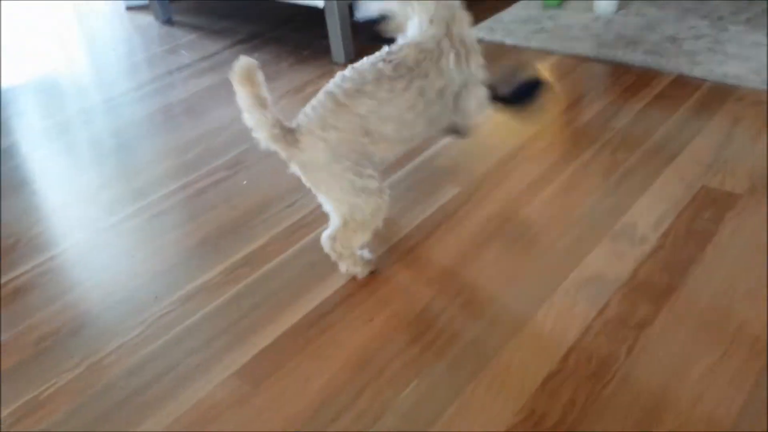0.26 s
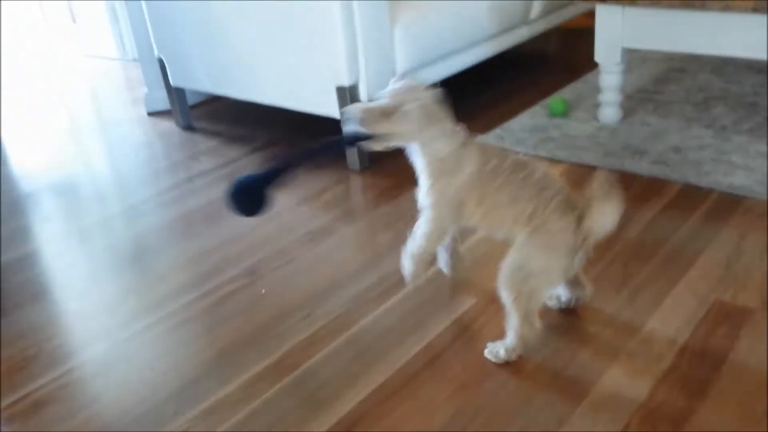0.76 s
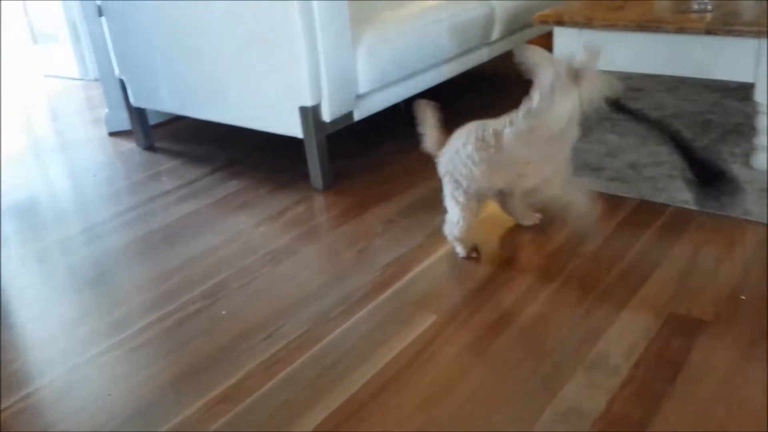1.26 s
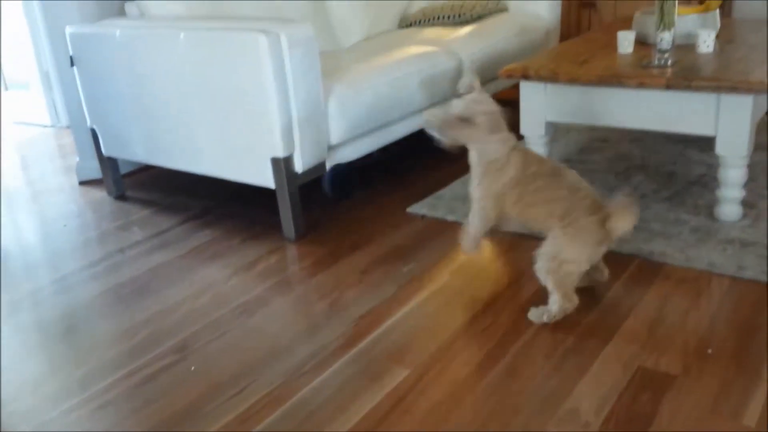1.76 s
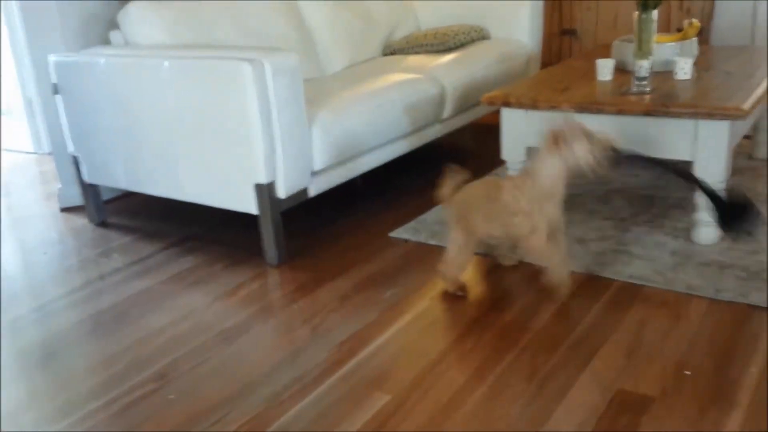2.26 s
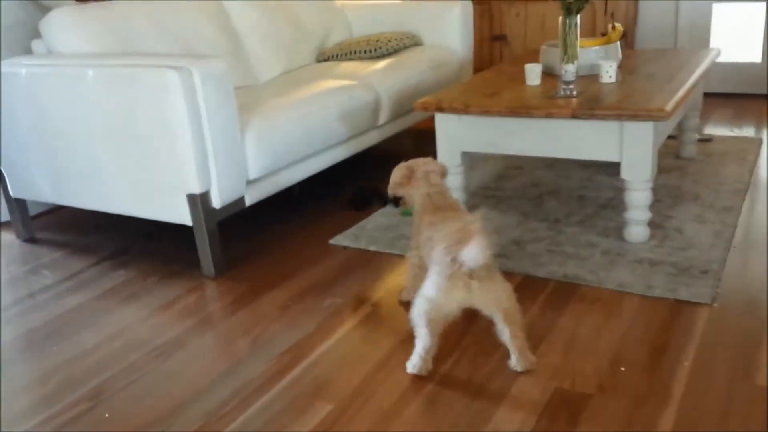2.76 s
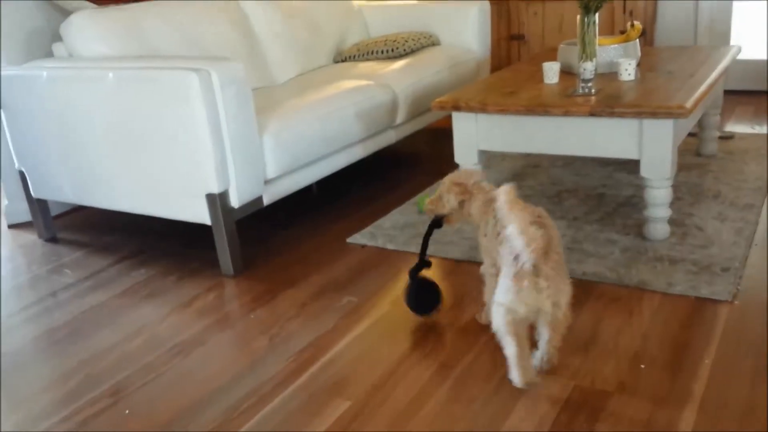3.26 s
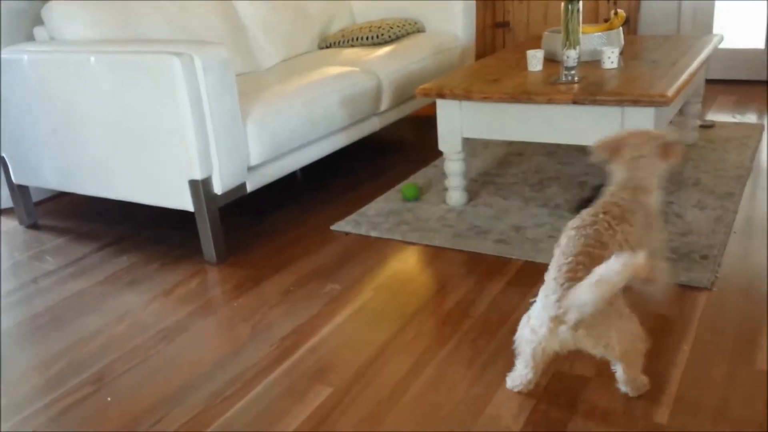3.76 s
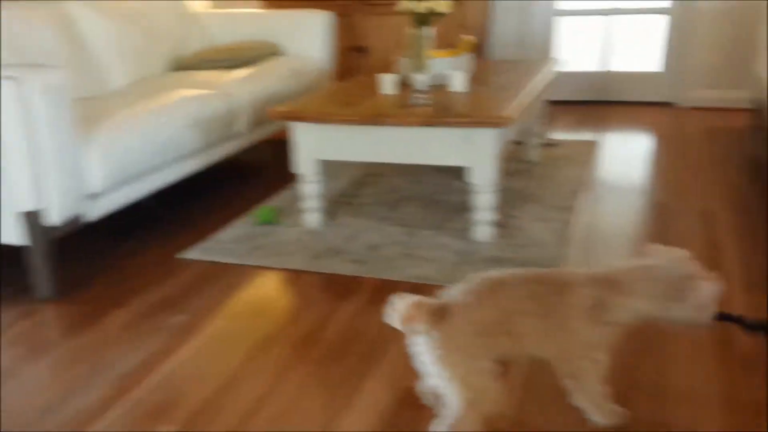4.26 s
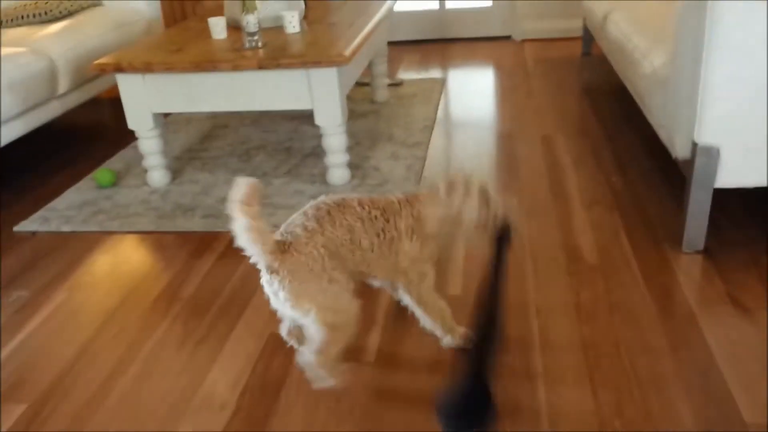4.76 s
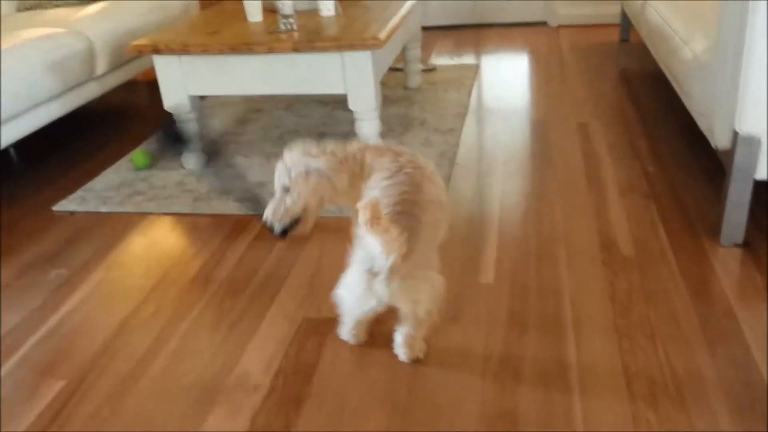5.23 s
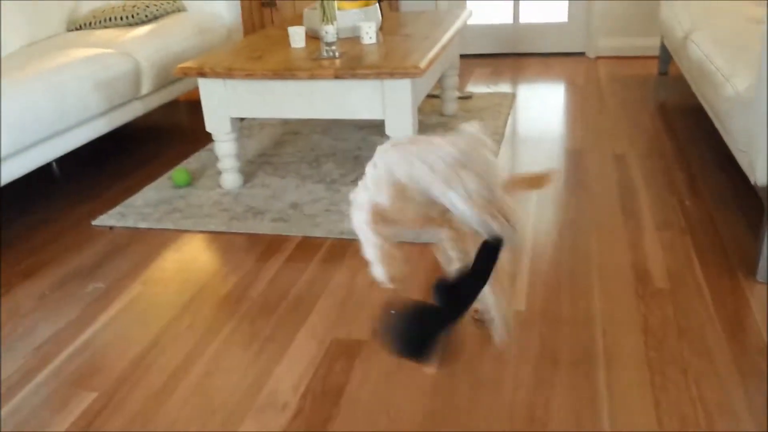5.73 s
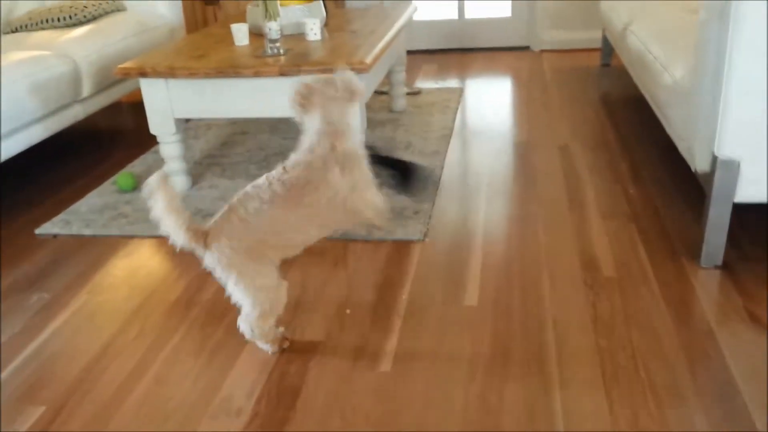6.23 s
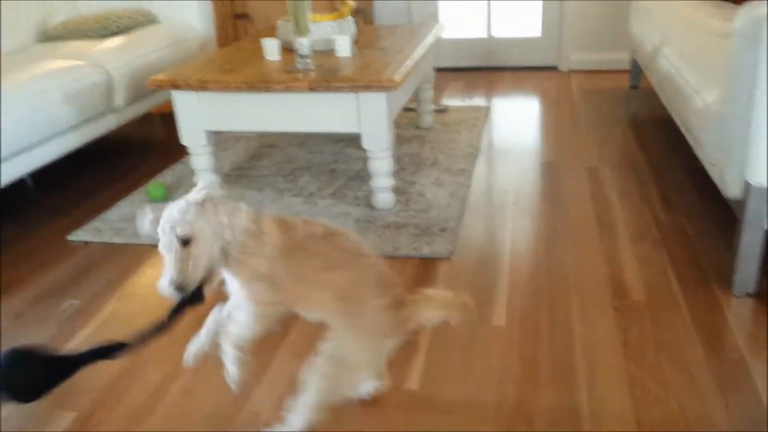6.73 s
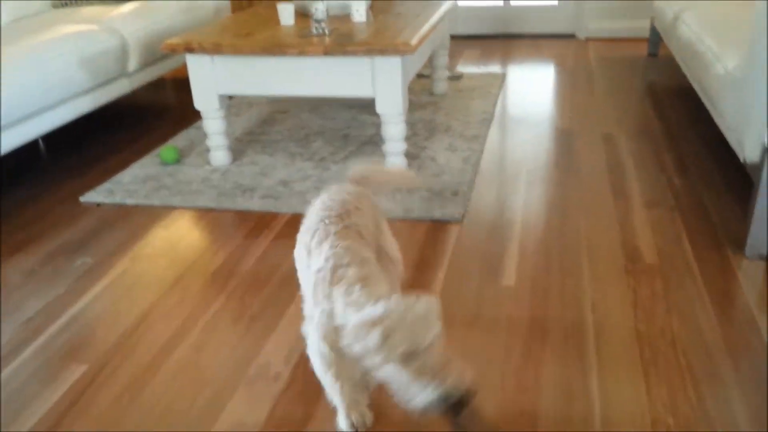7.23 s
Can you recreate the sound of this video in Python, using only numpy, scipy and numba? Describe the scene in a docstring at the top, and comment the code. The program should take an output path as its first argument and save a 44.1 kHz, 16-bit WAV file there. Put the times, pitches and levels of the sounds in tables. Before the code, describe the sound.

Short playful growls and snorts from a small dog indoors, mixed with sharp knocks, clicking claws and skids on floorboards.

```python
"""You hear a small dog growl and snort in play as it swings a ball on a strap around a living room.
Its vocal folds buzz through throat and mouth, and its breath hisses past the teeth and through the nose.
The ball knocks on the wooden floor, claws click and skid, paws thud, and a piece of metal clinks.
A finger muffles the left port (sound opening) of a hand-held microphone, then slides off with a few pops.
"""
import sys
import numpy as np
from scipy import signal
from scipy.fft import rfft, irfft
from scipy.io import wavfile
from scipy.ndimage import uniform_filter1d
from numba import njit

SR = 44100
rng = np.random.default_rng(int(sys.argv[2]) if len(sys.argv) > 2 else 0)


def output_pcm(signal):
    """Save a mono or channel-first signal as 16-bit PCM at the path in sys.argv[1].

    Samples are clipped to [-1, 1] before scaling.
    """
    pcm = np.clip(np.atleast_2d(signal).T, -1, 1) * 32767
    wavfile.write(sys.argv[1], SR, np.round(pcm).astype(np.int16))


N = 330617
TIME = np.arange(N) / SR

# Growls, each with one surge as the dog tugs. Each row: start, length and rise time in seconds;
# throat, mouth and hiss levels in dB; sag in dB per second; surge start in seconds; surge and extra
# mouth opening in dB; base pitch in Hz; roughness from 0 to 1; throat shift in octaves; hum offset in dB.
GROWLS = [(1.13, 0.36, 0.018, -23.5, -33.5, -43.5, 33, 1.24, 1, 4.5, 162.4, 0.21, 0.1, -7.5),
          (1.69, 0.3, 0.022, -27.5, -35, -49, 3, 1.925, 2.5, -5.5, 146.5, 0.25, -0.057, -8),
          (5.996, 0.4007, 0.0091, -20, -29.5, -41.5, 42, 6.28, 6, 1, 168.2, 0.18, 0.045, -13.5),
          (6.612, 0.33, 0.035, -25, -33.5, -47, 8, 6.738, 7.5, -2.5, 146.2, 0.35, 0.11, -10)]
# Snorts, with the mouth shut on the strap. Each row: start and length in seconds,
# throat and nose levels in dB, starting pitch of the whistle in Hz.
SNORTS = [(0.253, 0.021, -49.5, -55.5, 1640), (0.485, 0.089, -41.5, -51.5, 1684),
          (2.356, 0.22, -37, -46, 1658), (2.797, 0.075, -55.5, -51, 1763), (4.068, 0.051, -43, -47.5, 1660),
          (4.815, 0.075, -48, -49, 1663), (5.138, 0.042, -52.5, -59.5, 1720),
          (5.355, 0.087, -44, -51.5, 1600), (5.768, 0.059, -35, -46.5, 1697)]
# Where throat, mouth and nose ring. Each row: frequency in Hz, width in Hz, level in dB.
THROAT_RESONANCES = [(160.2, 93, -0.3), (237.5, 167, -2), (348, 169, -4.5)]
MOUTH_RESONANCES = [(686, 123, 3), (778, 163, 0), (956, 150, 3.5), (1226, 112, -6), (1541, 155, -3.5),
                    (2550, 410, -16), (3224, 210, -15.5)]
NOSE_RESONANCES = [(830, 450, 4.5), (1672, 307, 3.5), (2930, 3900, -8.5)]
# Ball and paws hitting the floor. Each row: start in seconds, level in dB, boom and slap offsets in dB.
KNOCKS = [(0.696, -32.5, 0.5, 21), (1.72, -18, -10.5, -2), (2.234, -21.5, -6, 4.5), (2.735, -35.5, 5.5, 12),
          (3.136, -25, -10, -4), (4.288, -34.5, -9.5, -2), (5.495, -26, -3, 14.5), (5.965, -27, -1.5, -6),
          (6.756, -8.5, -15, -16), (7.201, -14.5, -9, -4.5), (7.2085, -32, -13, -11)]
# Claws landing; a slow landing is a scuff. Each row: start in seconds, level in dB, landing in seconds.
CLAW_LANDINGS = [(0.544, -17.5, 0.014), (1.108, -10.5, 0.01), (1.608, -14.5, 0.019), (2.159, -13.5, 0.0036),
                 (2.658, -11.5, 0.0067), (2.82, -19, 0.0056), (3.175, -17, 0.008), (4.331, -21, 0.047),
                 (5.986, -6.5, 0.0072), (6.556, -9, 0.013), (7.0304, -18.5, 0.004), (7.332, -23.5, 0.0039)]
# Paws sliding. Each row: start and length in seconds, level in dB, fade in dB per second (minus grows).
SKIDS = [(0.0, 0.28, -50.5, 24), (1.92, 0.058, -36.5, 3), (2.391, 0.14, -41, 6), (3.6, 0.55, -60.5, -11),
         (4.285, 0.41, -51.5, 2.5), (7.233, 0.13, -44, 80)]
# Soft paw thuds and light blows on metal. Each row: start in seconds, level in dB.
PAW_THUDS = [(2.239, -18), (2.704, -13.5), (2.936, -26.5), (3.098, -25.5), (3.849, -29), (3.878, -29)]
CLINKS = [(3.398, -27.5), (3.861, -47), (4.232, -42)]
# The notes that floorboards and metal ring with. Each row: frequency in Hz, level in dB.
BOARD_NOTES = [(105, -9), (190, -6), (320, -4), (790, 3), (930, 0), (1180, -8), (1600, -8.5)]
METAL_NOTES = [(1665, -9), (2763, -5), (3362, -9.5), (4285, -10.5), (4945, -5), (6255, -6)]
# Tone of breath, the ball's cloth, claws, skids and the quiet room. Each row: frequency in Hz, gain in dB.
BREATH_TONE = [(1500, 1), (3000, -1), (5800, 1), (6900, 10.5), (9400, 6.5), (11500, -11), (15000, -111)]
CLOTH_TONE = [(150, -9.5), (950, 6.5), (1400, -3.5), (2200, -7.5), (8000, -20), (14000, -35)]
CLAW_TONE = [(4000, -15.5), (6300, -2), (10000, 2.5), (15000, -23.5)]
SKID_TONE = [(400, 19), (900, 15.5), (1750, 18), (2400, 12), (8800, 13.5), (15000, -16.5)]
ROOM_TONE = [(30, -11), (300, -2.5), (600, -8.5), (1700, -14.5), (3000, -19), (6500, -11.5), (15000, -25)]
# The left port with the finger on it and off it. Each row: frequency in Hz, gain in dB.
PORT_COVERED = [(100, 2.5), (1000, -7), (2800, -18), (7000, -25), (15000, -24)]
PORT_FREED = [(100, 3), (2800, -1), (7000, -13.5), (15000, -20.5)]
# The finger rubbing the port. Each row: time in seconds, level in dB, width in seconds.
FINGER_POPS = [(4.267, -23.5, 0.0004), (4.351, -22, 0.0003), (4.4219, -4, 0.00029), (4.4389, -5, 0.0018),
               (4.444, -4.5, 0.00018), (4.4633, 1.5, 0.000059), (4.4714, -2.5, 0.000049),
               (4.498, -6, 0.000044), (4.5118, -6.5, 0.00004), (6.146, -4.5, 0.000053)]
# Rumble of the hand holding the microphone. Each row: time in seconds, level in dB.
HAND_RUMBLE = [(0, -54), (4.4, -45.5), (5, -67), (6.5, -60)]
# The room's echo. Each row: frequency in Hz, seconds to fade by 60 dB, level in dB,
# likeness of left and right (1 is the same).
ROOM_ECHO = [(93, 0.73, 1, 0.91), (247, 0.53, -0.5, 1), (770, 0.62, 6.5, 0.67), (1700, 0.94, 10.5, 0),
             (10100, 0.68, 8, 0.81)]


def dog(throat_db=-1, nose_db=-4, snort_hiss_db=-2, gust_db=3, rasp=0.7, leak=0.11,
        bend_octaves=0.11, jaw_octaves=0.064):
    """One voice box drives chest, throat and mouth, which bend as the head shakes; breath adds hiss."""
    (throat_gain, mouth_gain, air_gain, hum_gain), pitch_hz, roughness, shift = growl_controls()
    shake = wander()
    bend = bend_octaves * shake
    pitch_hz = pitch_hz * 2 ** bend
    slaps, puffs = vocal_folds(pitch_hz, roughness)
    hum = cut(np.sin(2 * np.pi * np.cumsum(pitch_hz) / SR), 139, "high", order=6)
    buzz = slaps + rasp * puffs * noise()
    throat = resonate(buzz, THROAT_RESONANCES, shift + bend)
    throat = evened(cut(cut(throat, 430, "low", order=6), 132.7, "high", order=6))
    mouth = evened(resonate(buzz, MOUTH_RESONANCES, jaw_octaves * shake))
    nose = evened(resonate((puffs + 1) * noise(), NOSE_RESONANCES, jaw_octaves * shake / 2))
    hiss = evened(coloured((puffs + leak) * noise(), BREATH_TONE))
    hiss *= from_db(gust_db * wander())  # air gusts past the teeth
    voice = from_db(throat_db) * throat_gain * throat + mouth_gain * mouth + hum_gain * hum
    breath = air_gain * (hiss + from_db(nose_db) * nose)
    return voice + breath + snorts(throat, nose + from_db(snort_hiss_db) * hiss)


def growl_controls(release_s=0.051, surge_rise_s=0.036, octaves_per_db=0.205):
    """Effort sags through each growl and surges once; loudness and pitch follow it."""
    gains = np.zeros((4, N))
    # Between growls the voice is set for snorts: the throat rings lower with the mouth shut.
    pitch_hz, roughness, shift_octaves = np.full(N, 133.5), np.full(N, 0.3), np.full(N, -0.18)
    for (start, length_s, rise_s, throat_db, mouth_db, hiss_db, sag,
         surge_start, surge_db, opening_db, base_hz, rough, octaves, hum_db) in GROWLS:
        span = (TIME >= start) & (TIME < start + length_s + 2 * release_s)
        t = TIME[span] - start
        tug = np.maximum(TIME[span] - surge_start, 0) / surge_rise_s
        surge = (tug * np.exp(1 - tug)) ** 2
        effort_db = surge_db * surge - sag * t
        levels_db = [throat_db + effort_db,
                     mouth_db + 0.95 * effort_db + opening_db * surge,
                     hiss_db + 0.86 * effort_db,
                     throat_db + hum_db + effort_db]
        gains[:, span] = held(t, length_s, rise_s, release_s) * from_db(levels_db)
        pitch_hz[span] = base_hz * 2 ** (octaves_per_db * effort_db)
        roughness[span], shift_octaves[span] = rough, octaves
    return gains, pitch_hz, roughness, shift_octaves


def vocal_folds(pitch_hz, roughness, jitter=0.35, shimmer_db=9, flutter_hz=30, flutter_db=8, puff_s=0.0022):
    """The folds slap shut unevenly, throbbing with the loose throat; a puff of air follows each slap."""
    slaps, now, flutter = np.zeros(N), 0, 0
    for late, strong, slip in rng.standard_normal((1600, 3)).clip(-2, 2):
        i = min(int(now * SR), N - 1)
        slap_db = roughness[i] * (shimmer_db * strong + flutter_db * np.sin(flutter))
        add(slaps, now, from_db([slap_db]))
        period = np.exp(jitter * roughness[i] * late) / pitch_hz[i]
        now += period
        flutter += 2 * np.pi * flutter_hz * period + slip / 2
    puffs = signal.lfilter([1], [1, -np.exp(-1 / (puff_s * SR))], slaps)
    return rms_one(slaps), rms_one(puffs)


def snorts(throat, breath, rise_s=0.0048, whistle_db=2, whistle_width_hz=62, sink_octaves_per_s=1):
    """Each snort is a short grunt and a blast of breath, with a sinking whistle from the nostrils."""
    grunt_gain, breath_gain, whistles = np.zeros((3, N))
    t = TIME[:SR // 2]
    for start, length_s, throat_db, nose_db, hz in SNORTS:
        swell = (1 - np.exp(-(t / rise_s) ** 2)) * np.exp(-(t / length_s) ** 4)
        whistle = evened(resonate(noise()[:len(t)], [(hz, whistle_width_hz, 0)], -sink_octaves_per_s * t))
        add(grunt_gain, start, from_db(throat_db) * swell)
        add(breath_gain, start, from_db(nose_db) * swell)
        add(whistles, start, from_db(nose_db + whistle_db) * swell * np.exp(-t / length_s) * whistle)
    return grunt_gain * throat + breath_gain * breath + whistles


def knocks(level_db=-2, boom_db=8, slap_db=14, slap_fade_s=0.04, ring_cycles=13, folds_per_s=800):
    """A blow makes the boards ring, low notes longest; the ball's cloth slaps down, fold after fold."""
    out, t = np.zeros(N), TIME[:SR // 3]
    for start, knock_db, boom, slap in KNOCKS:
        notes = [(hz, db + (boom + boom_db) * (hz < 400), ring_cycles / hz) for hz, db in BOARD_NOTES]
        wood = struck(notes, t)
        folds = (rng.random(len(t)) < folds_per_s / SR) * rng.uniform(-1.94, 1, len(t))
        folds[0] = 1
        cloth = coloured(folds * from_db(slap + slap_db - 60 * t / slap_fade_s), CLOTH_TONE)
        add(out, start, from_db(knock_db + level_db) * (wood + cloth))
    return out


def smacks(level_db=1, hz=880, rise_s=0.0006, slap_share=0.25):
    """The instant of contact with the boards: one or two hard cycles, stronger with the slap."""
    out, t = np.zeros(N), TIME[:SR // 2]
    smack = np.cos(2 * np.pi * hz * t) * t / rise_s * np.exp(1 - t / rise_s)
    for start, knock_db, _, slap in KNOCKS:
        add(out, start, from_db(knock_db + level_db + slap_share * slap) * smack)
    return out


def claws(level_db=4, ticks_per_s=300, scatter_db=-18, spread_db=7, sharp_s=0.0039):
    """Ticks swell and die away as a paw lands; the quicker the landing, the stronger the first tick."""
    out, t = np.zeros(N), TIME[:SR // 5]
    for start, db, landing_s in CLAW_LANDINGS:
        swell = t / landing_s * np.exp(1 - t / landing_s)
        sizes = from_db(scatter_db + spread_db * rng.standard_normal(len(t)).clip(-2, 2))
        ticks = swell * sizes * (rng.random(len(t)) < ticks_per_s / SR) * rng.choice([-1, 1], len(t))
        ticks[0] = sharp_s / landing_s
        add(out, start, from_db(db + level_db) * ticks)
    return 2 * coloured(out, CLAW_TONE)


def skids(grain_db=7, grain_samples=40):
    """Pads and claws scrape over the boards in fine grains."""
    gain, t = np.zeros(N), TIME[:SR]
    for start, length_s, db, fade in SKIDS:
        add(gain, start, held(t, length_s, rise_s=0.0012, release_s=0.082) * from_db(db - fade * t))
    scrape = noise()
    grain_sizes = from_db(grain_db * rng.standard_normal(N // grain_samples + 1).clip(-2, 2))
    scrape *= np.repeat(grain_sizes, grain_samples)[:N]
    return gain * rms_one(coloured(scrape, SKID_TONE))


def paw_thuds(level_db=-1, soft_hz=75, hard_hz=130, ring_cycles=5):
    """A paw pushes the floor briefly; a harder landing is shorter and higher."""
    out, t = np.zeros(N), TIME[:SR // 5]
    for start, db in PAW_THUDS:
        hz = np.interp(db, [-35, -20], [soft_hz, hard_hz])
        swell = (1 - np.exp(-2 * hz * t)) * from_db(-60 * t * hz / ring_cycles)
        add(out, start, 2 * from_db(db + level_db) * swell * np.sin(2 * np.pi * hz * t))
    return out


def metal_clinks(rattle_db=-8, rattle_fade_s=0.04, strike_db=9, strike_fade_s=0.025, ring_fade_s=0.055):
    """Light blows on metal: a brief rattle, a bright strike and a short ring."""
    out, t = np.zeros(N), TIME[:SR // 2]
    for start, clink_db in CLINKS:
        rattle = cut(rng.standard_normal(len(t)), [600, 7000], "band")
        rattle *= from_db(rattle_db - 60 * t / rattle_fade_s)
        strike = cut(noise()[:len(t)], [4200, 4900], "band") * from_db(strike_db - 60 * t / strike_fade_s)
        ring = struck([(hz, db, ring_fade_s) for hz, db in METAL_NOTES], t)
        add(out, start, from_db(clink_db) * (rattle + strike + ring))
    return out


def finger_muffle(x, off_at_s=4.463, slide_s=0.034):
    """The finger muffles the left port; more treble gets in once it slides off."""
    freed = np.clip((TIME - off_at_s) / slide_s + 0.5, 0, 1)
    return (1 - freed) * coloured(x, PORT_COVERED) + freed * coloured(x, PORT_FREED)


def handling_noise(rumble_band_hz=(24, 110), hiss_db=-65):
    """The finger makes sharp pressure dips that rebound slowly; the hand rumbles over a faint hiss."""
    pops, t = np.zeros(N), TIME[:SR // 100] - 0.005
    for centre_s, db, width_s in FINGER_POPS:
        add(pops, centre_s + t[0], -from_db(db) * np.exp(-np.abs(t) / width_s))
    rumble_gain = from_db(np.interp(TIME, *np.transpose(HAND_RUMBLE)))
    rumble = rumble_gain * rms_one(cut(noise(), rumble_band_hz, "band"))
    return cut(pops, 110, "high") + rumble + from_db(hiss_db) * noise()


def living_room(x, spots=4, spots_per_s=3):
    """As the dog darts about, its sound passes from one pattern of echoes to another."""
    out = 0
    for spot in range(spots):
        away = np.abs((spots_per_s * TIME - spot + spots / 2) % spots - spots / 2)
        share = np.cos(np.pi / 2 * np.minimum(away, 1))
        out = out + signal.fftconvolve((x * share)[None], reflections(), axes=1)[:, :N]
    return out


def reflections(first_s=0.00044, early_db=5, early_s=0.089):
    """The room's answer at one spot: dense echoes, strongest early, each band dying at its own pace."""
    t, response = TIME[:SR * 2 // 3], 0
    edges_hz = 45 * 2 ** np.arange(0, 8.6, 0.5)
    white = rng.standard_normal((2, 2, len(t)))
    onset = np.clip(t / first_s - 0.5, 0, 1) * from_db(early_db * np.exp(-t / early_s))
    for k, (low, high) in enumerate(zip(edges_hz, edges_hz[1:])):
        fade_s, db, alike = (at_hz(ROOM_ECHO, np.sqrt(low * high), column) for column in (1, 2, 3))
        mid, side = cut(white[k % 2], [low, high], "band")
        stereo = np.sqrt(1 + alike) * mid + np.sqrt(1 - alike) * side * [[1], [-1]]
        tail = rms_one(stereo * onset * from_db(-60 * t / fade_s))
        band_share = np.sqrt(2 * (high - low) / SR / len(t))
        response = response + from_db(db) * band_share * tail
    return response


def room_tone(level_db=-54, left_db=-4):
    """The steady, soft rush of the room, weaker on the left."""
    return np.array([from_db(level_db + db) * rms_one(coloured(noise(), ROOM_TONE)) for db in (left_db, 0)])


def resonate(x, resonances, shift_octaves):
    """Resonances that shift together, each applied twice to deepen the valleys between them."""
    out, radians_per_hz = 0, 2 * np.pi / SR
    for k, (hz, width_hz, db) in enumerate(resonances):
        centre = radians_per_hz * hz * 2 ** shift_octaves
        width = radians_per_hz * 1.5 * width_hz  # two passes narrow it again
        ringing = moving_peak(moving_peak(x, centre, width), centre, width)
        out = out + (-1) ** k * from_db(db) * ringing
    return out


@njit
def moving_peak(x, centre, width):
    """One resonance whose centre can move; centre and width are in radians per sample."""
    out, g = np.zeros(len(x)), 1 / (1 + np.tan(width / 2))
    for i in range(2, len(x)):
        feedback = 2 * g * np.cos(centre[i]) * out[i - 1] - (2 * g - 1) * out[i - 2]
        out[i] = (1 - g) * (x[i] - x[i - 2]) + feedback
    return out


def struck(notes, t):
    """Notes that fall 60 dB in their fade time, each a little louder or softer on every blow."""
    return sum((-1) ** k * from_db(db + rng.normal() - 60 * t / fade_s) * np.sin(2 * np.pi * hz * t)
               for k, (hz, db, fade_s) in enumerate(notes))


def held(t, length_s, rise_s, release_s):
    """Gain of a sound that swells, holds and is let go."""
    since_release = np.maximum(t - length_s + release_s, 0)
    return (1 - np.exp(-(t / rise_s) ** 2)) * np.exp(-(since_release / release_s) ** 2)


def coloured(x, tone, size=4096):
    """Gives a sound the tone in a table, with no ringing ahead of it (a minimum-phase filter)."""
    gains = from_db(at_hz(tone, np.arange(size // 2 + 1) * SR / size))
    cepstrum = irfft(np.log(gains))
    cepstrum[1:size // 2] *= 2
    cepstrum[size // 2 + 1:] = 0
    return signal.oaconvolve(x, irfft(np.exp(rfft(cepstrum))))[:len(x)]


def cut(x, hz, keep, order=2):
    """Keeps the lows, the highs or one band."""
    return signal.sosfilt(signal.butter(order, hz, keep, fs=SR, output="sos"), x + 1e-18)


def at_hz(table, hz, column=1):
    """Reads between a table's rows, with octaves evenly spaced."""
    table = np.array(table)
    return np.interp(np.log(hz + 1e-9), np.log(table[:, 0]), table[:, column])


def wander(top_hz=14):
    """A slow random sway with a spread of 1."""
    return rms_one(cut(noise(), top_hz, "low"))


def evened(x):
    """Holds the short-term average level (rms) at 1."""
    return x / np.sqrt(np.abs(uniform_filter1d(x ** 2, size=1800)) + 1e-12)


def rms_one(x):
    return x / np.sqrt(np.mean(x ** 2) + 1e-20)


def from_db(db):
    return 10 ** (np.asarray(db) / 20)


def noise():
    return rng.standard_normal(N)


def add(track, start_s, sound):
    start = max(0, round(start_s * SR))
    track[start:start + len(sound)] += sound[:max(0, N - start)]


def scene(direct_db=-1, claws_direct_db=3, thud_right_db=-10, left_delay_samples=6):
    """The dog plays a little to the right, so its direct sound reaches the left port later."""
    play = dog() + knocks() + skids() + metal_clinks()
    ticks = claws()
    near = from_db(direct_db) * play + from_db(claws_direct_db) * ticks + smacks()
    direct = np.array([np.roll(near, left_delay_samples), near])
    thuds = paw_thuds() * from_db([[0], [thud_right_db]])
    left, right = direct + thuds + room_tone() + living_room(play + ticks)
    return np.array([finger_muffle(left) + handling_noise(), right])


def record(dry, cutoff_hz=14600):
    """The highest treble is cut off steeply."""
    return signal.sosfilt(signal.ellip(10, 0.1, 80, cutoff_hz, fs=SR, output="sos"), dry)


dry = scene()
out = record(dry)
output_pcm(out)
```